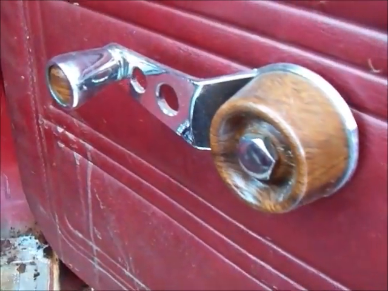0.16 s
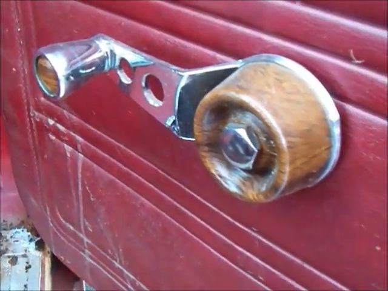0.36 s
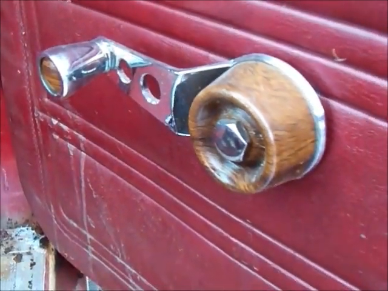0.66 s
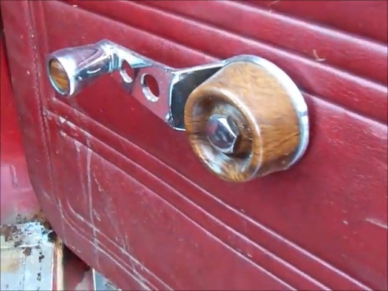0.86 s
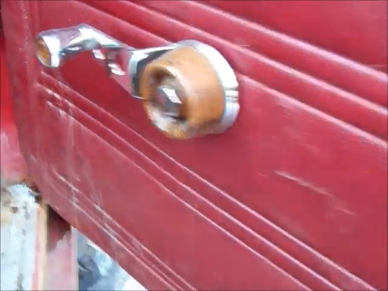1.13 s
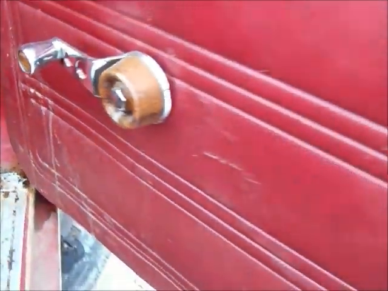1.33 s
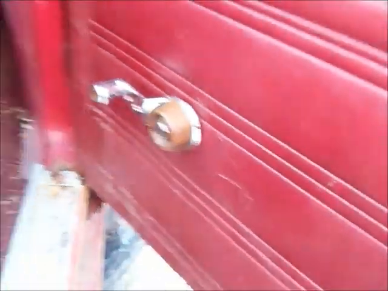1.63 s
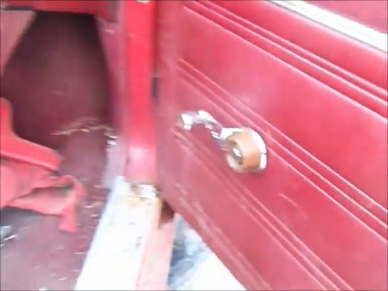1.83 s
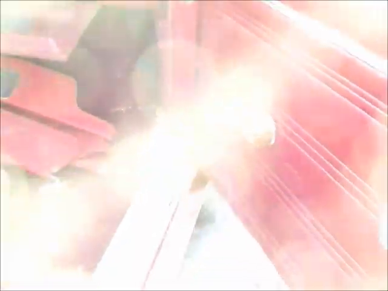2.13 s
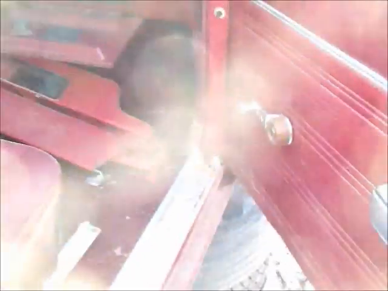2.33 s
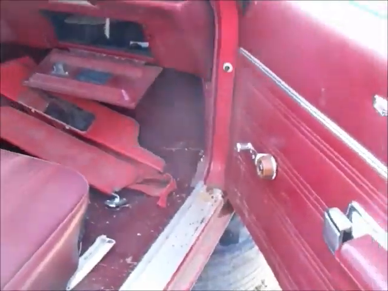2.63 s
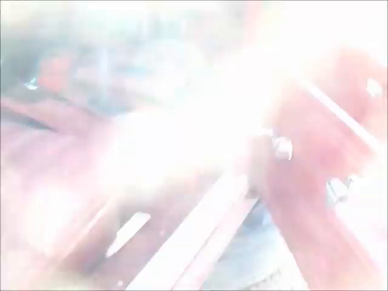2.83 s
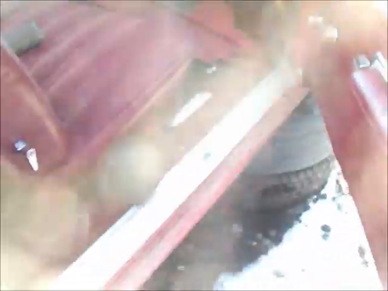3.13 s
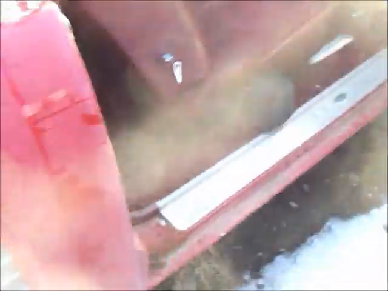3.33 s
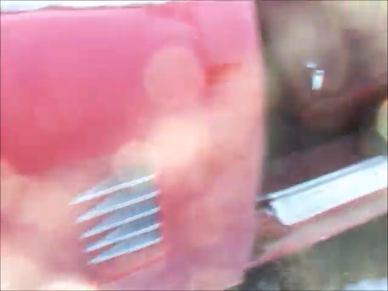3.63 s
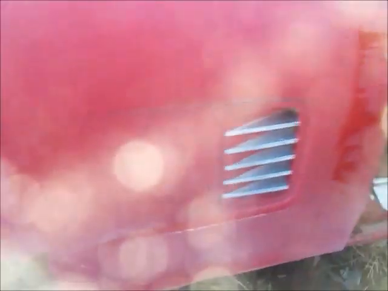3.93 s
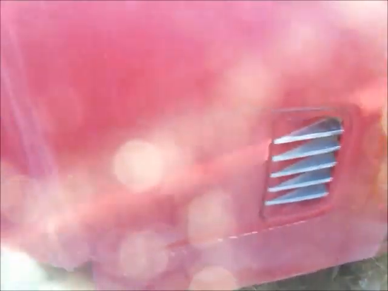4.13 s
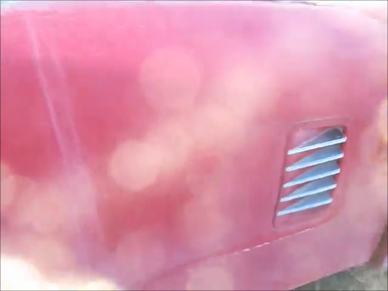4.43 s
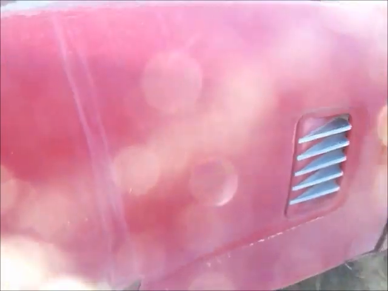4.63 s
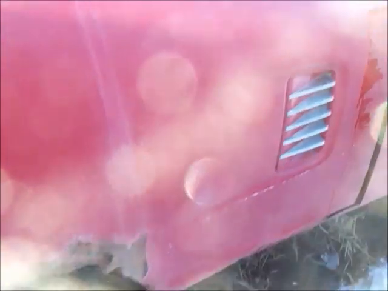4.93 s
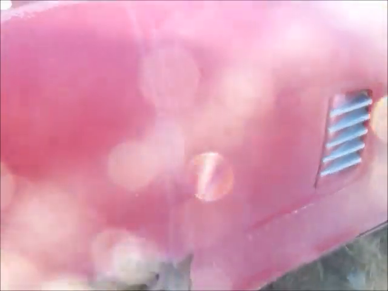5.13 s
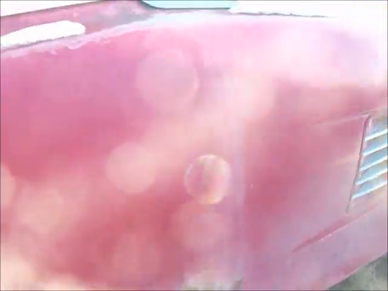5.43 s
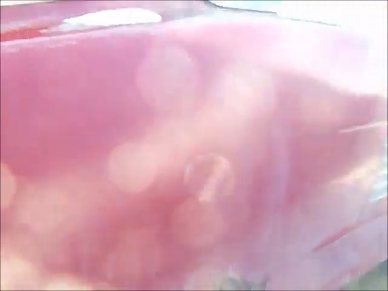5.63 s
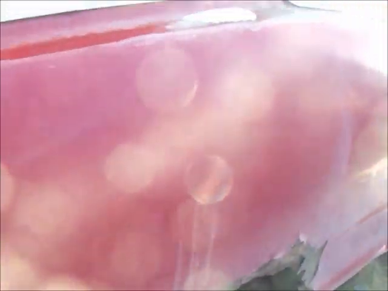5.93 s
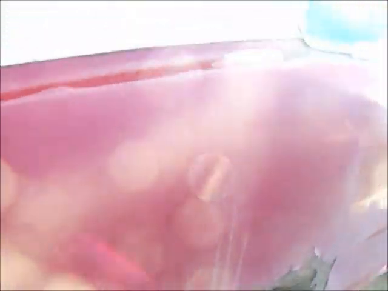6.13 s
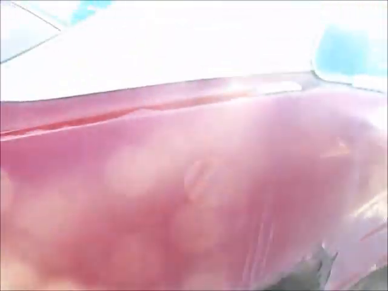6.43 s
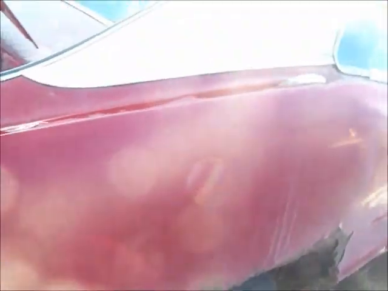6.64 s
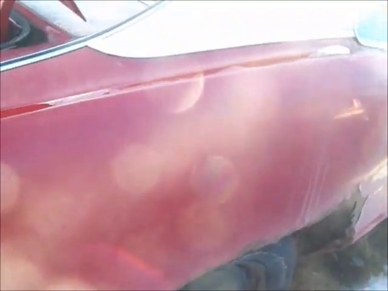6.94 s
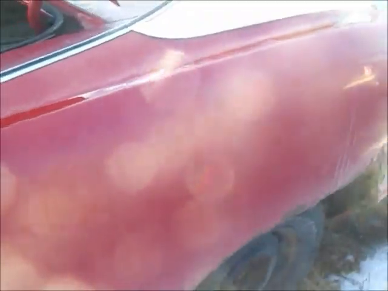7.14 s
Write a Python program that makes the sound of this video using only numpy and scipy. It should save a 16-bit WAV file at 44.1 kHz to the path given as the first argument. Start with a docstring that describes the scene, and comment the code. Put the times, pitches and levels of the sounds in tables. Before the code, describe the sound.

Outdoors beside an old car, faint wind, low hum and hiss lie under soft scuffs of shoes and clothing. A few crisp clicks lead to two ringing clunks from the loose steel door. It then slams and latches with a rattle and quick fading rebounds, overloading the close microphone. Lighter knocks and scuffs follow, ending with dull handling bumps.

```python
"""Outdoors beside an old car, light knocks, scuffs and clicks sound over faint wind, low hum and hiss.
Near 3.7 s the loose steel door clunks twice: each blow rings the modes of its skin and shakes the body.
Near 4.5 s the latch catches with a rattle, and the door settles in three fading rebounds.
These peaks overload the close microphone, whose gain control ducks the sound and slowly recovers.
More knocks and scuffs follow, and dull bumps on the hand-held camera close the scene."""
import sys
import numpy as np
from scipy import signal
from scipy.fft import rfft, irfft
from scipy.io import wavfile

SR = 44100
rng = np.random.default_rng(int(sys.argv[2]) if len(sys.argv) > 2 else 0)


def to_wav(s):
    """Save 16-bit WAV."""
    ch = np.atleast_2d(s).T  # columns
    pcm = np.round(np.clip(ch, -1, 1) * 32767)  # PCM
    wavfile.write(sys.argv[1], SR, pcm.astype(np.int16))


N = 320882
TIME = np.arange(N) / SR
AGE = np.arange(SR) / SR  # time since a blow, t/s

# blows on the door: t/s, level/dB, low cut f/Hz, contact cut-off f/Hz, door modes/dB, latch/dB, boom/dB
DOOR_BLOWS = [(3.727, -8, 350, 3770, 5.5, 0, -17.5), (3.91, -6, 135, 525, 9, -14, -10),
              (4.4995, -12, 70, 4000, -6.5, -4.5, -3.5), (4.512, -12, 90, 2200, -20, -12, -18),
              (4.5245, -12.5, 70, 550, 3.5, 3, -6.5), (4.572, -22, 80, 1600, -9, 1.5, -3),
              (4.588, -14, 70, 221, -15, -7.5, -11)]
# distinct modes of the door skin: f/Hz, level/dB, nominal T60/s
DOOR_MODES = [(220, -18, 0.49), (335.7, -1.5, 0.22), (346.3, 1.5, .22), (383.4, -12.5, 0.44),
              (480.4, -13, 0.11), (576, -3, 0.12), (693.4, 0.5, 0.11), (713, -12.5, 0.2), (820, -6.5, 0.11),
              (885, -1.5, 0.13), (980, -5, 0.18), (1045, 6, 0.077), (1217, -14.5, 0.16), (1304, -4, 0.085),
              (1290, -12.5, 0.045), (1457, -15, 0.21), (1490, -3, 0.1), (1640, -15, 0.19), (1768, 1, 0.084),
              (2383, -36, .11), (3400, -6, 0.069), (3730, -15, 0.113), (3800, -11, .11), (5140, 4, 0.055),
              (6000, -3, .05)]
# crowded lesser modes of the sheet steel: f/Hz, spectral level/dB, nominal T60/s
PANEL_BANDS = [(60, 3, 0.944), (139, 1.5, 0.39), (276, 0.5, 0.4), (604, -2, 0.3), (1010, -0.5, 0.25),
               (1836, -4, 0.18), (2296, -9, .11), (3540, -15.5, 0.17), (5820, -6, 0.14), (14500, -14, 0.13)]
# clash of the latch parts: f/Hz, spectral level/dB, T60/s
LATCH_BANDS = [(297, -2, 0.052), (987, -3.5, 0.15), (2210, 1, 0.092), (3450, 9, 0.071), (5700, 3.5, 0.052),
               (7740, -2.5, 0.069), (13400, 16.5, 0.022)]
# low modes of the whole car body: f/Hz, level/dB, T60/s
BODY_MODES = [(31.48, -5.5, 1), (42, -6.5, 0.29), (84.7, -6.5, 0.27), (102.7, -1, 0.21), (132, -2.5, 0.24)]
# light knocks: t/s, level/dB, centre f/Hz, bandwidth/Hz, T60/s
KNOCKS = [(.329, -33, 210, 111, 0.09), (0.337, -38, 457, 435, 0.19), (1.915, -40, 1370, 2400, 0.057),
          (2.731, -39.5, 676, 970, 0.064), (2.76, -39, 725, 1400, 0.16), (3.5989, -23, 563, 650, 0.021),
          (3.652, -29.5, 512, 807, 0.025), (4.411, -28, 1000, 170, 0.041), (5.151, -38.5, 626, 850, 0.031),
          (5.307, -35.5, 420, 980, 0.022), (5.474, -35.5, 390, 734, 0.029), (5.604, -40, 980, 2580, 0.059),
          (6.076, -47, 1590, 3020, .037), (6.259, -35.5, 596, 1400, 0.081),
          (6.326, -28.5, 600, 2200, 0.061), (6.571, -27.5, 676, 517, .023),
          (6.794, -36.5, 740, 2300, 0.077), (6.839, -44, 1000, 2600, .04)]
# crisp clicks, and the sudden, slowly fading start of a scuff: t/s, level/dB, T60/s
BRIGHT_BURSTS = [(3.335, -38, 0.21), (3.439, -23.5, .024), (3.447, -24, 0.026), (3.461, -22.5, 0.027),
                 (4.276, -44.5, 0.63), (4.394, -31, .017), (4.794, -41, .014), (5.054, -43.5, .048),
                 (5.311, -34.5, .016), (6.326, -36.5, 0.032)]
# spectrum of these bursts: f/Hz, spectral level/dB
BURST_SPECTRUM = [(400, -5.5), (1200, 1), (2200, 1.5), (5000, -3), (10000, 1), (14500, -3)]
# dull bumps: t/s, level/dB, f/Hz
BUMPS = [(4.599, -14, 140), (6.267, -25, 86), (6.343, -21, 94), (6.348, -27, 236), (6.549, -21.5, 51.3),
         (6.96, -15.5, 69.5), (7.094, -27, 141)]
# scuffs of shoes and clothing, and at 3.55 s a rub of the door hinge: t/s, duration/s, level/dB, cut-off f/Hz
SCUFFS = [(1.478, 0.59, -52, 4660), (1.707, 0.13, -41, 5030), (1.815, 0.1, -39.5, 5500),
          (2.203, 0.052, -45.5, 7000), (2.587, .125, -48.5, 4000), (2.874, 0.11, -53.5, 4000),
          (3.55, 0.21, -47, 1470), (4.286, .24, -48, 5900), (4.602, 0.11, -49.5, 5900),
          (5.229, 0.031, -49, 14000), (5.459, .17, -51.5, 9400), (5.587, 0.076, -42.5, 5000),
          (6.173, 0.24, -54.5, 3640), (6.891, 0.13, -53, 3000)]
# spectrum of rubbing: f/Hz, spectral level/dB
SCUFF_SPECTRUM = [(150, -24), (500, -4), (1400, -3.5), (1750, 1), (2300, -8.5), (3100, -5.5), (4800, -9),
                  (7200, -6.5), (10000, -8), (14500, -3)]
# gusts: peak t/s, half-width/s, level/dB
GUSTS = [(3.95, 0.23, -36.5), (4.773, 0.07, -37), (6.338, 0.12, -33.5), (7.077, 0.22, -37.5)]
# wind rumble on the microphone with a low hum near 40 Hz: f/Hz, spectral level/dB
WIND_AND_HUM_SPECTRUM = [(12, -1.5), (28, -4), (39, 4), (50, -5.5), (120, -14), (220, -21.5), (500, -33.5),
                         (2000, -73.5)]
# distant outdoor murk and microphone hiss: f/Hz, spectral level/dB
HUSH_SPECTRUM = [(30, -6), (120, -1), (300, -3.5), (600, -8.5), (1200, -14.5), (2500, -19), (4100, -19.5),
                 (4550, -13), (5050, -21.5), (6400, -22.5), (7200, -21), (8200, -24), (14500, -25)]
# slow course of that hush: t/s, level/dB
HUSH_LEVELS = [(0, -52), (3.5, -50), (5, -53.5), (6, -53.5), (7.28, -48.5)]


def door(caught_s=4.2, settle_s=4.627, gap_s=0.078, rebound_db=-29.5, drop_db=4.5):
    """Inelastic impacts: the door clunks, is caught by the latch and loses energy at every rebound."""
    # held fast, the door rings longer and the latch clashes more brightly
    loose, caught = dict(t60_scale=0.76, latch_hz=8400), dict(t60_scale=0.93, latch_hz=10800)
    out = np.zeros(N)
    for s, db, *timbre in DOOR_BLOWS:
        add(out, s, undb(db) * door_blow(*timbre, **(loose if s < caught_s else caught)))
    for k in range(3):
        rebound = door_blow(low_hz=105, contact_hz=800, modes_db=-3, latch_db=-11, boom_db=0, **caught)
        add(out, settle_s + k * gap_s, undb(rebound_db - k * drop_db) * rebound)
    return out


def door_blow(low_hz, contact_hz, modes_db, latch_db, boom_db, t60_scale, latch_hz):
    """Superposition: one blow excites the door skin, the latch and, more slowly, the booming body."""
    panel = dense_modes(PANEL_BANDS, t60_scale)
    ringing = undb(modes_db) * ring(DOOR_MODES, detune=0.0032, t60_scale=t60_scale)
    skin = roll_off(panel + ringing, contact_hz)  # a softer contact carries less treble
    impact = swell(rise_s=0.0021) * (skin + latch(latch_db, latch_hz))
    clunk = roll_off(impact, low_hz, "highpass", order=2)  # a smaller contact carries less bass
    boom = undb(boom_db) * swell(rise_s=0.011) * ring(BODY_MODES, detune=0.03)
    return clunk + boom


def latch(db, cutoff_hz, bite_s=0.0035, bite_db=2.5, chatter_db=1.0):
    """Double impact: the latch parts graze, bite a moment later and chatter as they ring."""
    bite = undb(bite_db) * swell(rise_s=0.0006) * dense_modes(LATCH_BANDS)
    late_bite = np.pad(bite, (int(bite_s * SR), 0))[:SR]
    chatter = undb(db + chatter_db * wander(rate_hz=900, size=SR))
    graze = dense_modes(LATCH_BANDS)
    return roll_off(chatter * (graze + late_bite), cutoff_hz, order=2)


def ring(modes, detune, t60_scale=1):
    """Free vibration: a sum of damped normal modes, slightly detuned at every blow."""
    waves = np.zeros(SR)
    for hz, db, t60 in modes:
        cycles = hz * rng.normal(1, detune) * AGE
        phase = (hz > 450) * rng.random()  # low modes follow the push; higher ones vary with the spot hit
        waves += undb(db) * decay(t60 * t60_scale) * np.sin(2 * np.pi * (cycles + phase))
    return waves / np.sqrt(sum(undb(db) ** 2 for _, db, _ in modes) / 2)


def dense_modes(bands, t60_scale=1, rise_cycles=0.43):
    """Modal overlap: crowded modes merge into noise, each band building and dying at its own rate."""
    noise = coloured(rng.standard_normal(SR), bands)
    log_hz = np.log([hz for hz, _, _ in bands])
    out = np.zeros(SR)
    for share, (hz, _, t60) in zip(np.eye(len(bands)), bands):
        band = filtered(noise, lambda f: np.interp(np.log(f), log_hz, share))
        out += band * decay(t60 * t60_scale) * swell(rise_cycles / hz)
    return out


def light_contacts():
    """Transient excitation: light contacts give separate knocks, bright bursts and bumps."""
    out = np.zeros(N)
    for source, events in (knock, KNOCKS), (bright_burst, BRIGHT_BURSTS), (bump, BUMPS):
        for s, db, *settings in events:
            add(out, s, undb(db) * source(*settings))
    return out


def knock(hz, width_hz, t60, tap=2.9):
    """Forced response: a tap and its brief chatter drive one broad, well damped resonance."""
    force = rng.standard_normal(SR) * decay(t60)
    force[0] += tap
    response = filtered(force, lambda f: (1 + 1j * (f - hz ** 2 / f) / width_hz) ** -2)
    return unit_rms(response) * np.sqrt(np.mean(decay(t60) ** 2))


def bright_burst(t60):
    """Broadband transient: sudden noise is heard as a click if brief, as a fading hiss if long."""
    return coloured(rng.standard_normal(SR), BURST_SPECTRUM) * decay(t60) * swell(rise_s=0.0012)


def bump(hz, t60_cycles=6):
    """Heavy damping: one low mode dies within a few cycles and is heard as a thud."""
    return np.sin(2 * np.pi * hz * AGE) * decay(t60_cycles / hz) * swell(rise_s=0.0014)


def scuffs(grit_db=3.5, taper=0.73):
    """Stick-slip friction: shoes, clothing and the door hinge catch and release in fine, uneven grains."""
    out = np.zeros(N)
    for s, length_s, db, cutoff_hz in SCUFFS:
        grains = rng.standard_normal(SR) * undb(grit_db * wander(rate_hz=700, size=SR))
        rubbing = roll_off(coloured(grains, SCUFF_SPECTRUM), cutoff_hz)
        stroke = signal.windows.tukey(int(length_s * SR), taper)
        add(out, s, undb(db) * unit_rms(rubbing[:len(stroke)]) * stroke)
    return out


def wind_and_hum(breeze_db=-46, easing_db_per_s=0.5, flutter_db=2):
    """Turbulence: an easing breeze and gusts buffet the microphone; a low hum is heard with them."""
    breeze = undb(breeze_db - easing_db_per_s * TIME)
    gusts = [undb(db) * np.exp(-((TIME - s) / half_s) ** 2) for s, half_s, db in GUSTS]
    strength = np.sqrt(breeze ** 2 + sum(gust ** 2 for gust in gusts))
    rumble = coloured(rng.standard_normal(N), WIND_AND_HUM_SPECTRUM)
    return rumble * strength * undb(flutter_db * wander(rate_hz=7.6, size=N))


def hush(waver_db=1.6):
    """Noise floor: distant outdoor sound and microphone hiss form one gently wavering bed."""
    noise = coloured(rng.standard_normal(N), HUSH_SPECTRUM)
    level_db = np.interp(TIME, *np.transpose(HUSH_LEVELS))
    return noise * undb(level_db - waver_db * wander(rate_hz=6.1, size=N))


def undb(db):
    """Amplitude ratio of a level in decibels."""
    return 10 ** (np.asarray(db) / 20)


def unit_rms(x):
    """Normalisation to rms 1."""
    return x / np.sqrt(np.mean(x ** 2))


def add(out, s, x):
    """Superposition of x on out, starting at s seconds."""
    i = int(s * SR)
    out[i:i + len(x)] += x[:N - i]


def decay(t60):
    """Exponential decay by 60 dB in t60 seconds."""
    return np.exp(-np.log(1000) * AGE / t60)


def swell(rise_s):
    """Finite rise time: force builds up while two parts press together."""
    return 1 - np.exp(-(AGE / rise_s) ** 2)


def filtered(x, response):
    """Linear filtering: the spectrum of x is multiplied by a frequency response."""
    return irfft(rfft(x) * response(np.fft.rfftfreq(len(x), 1 / SR) + 1e-6), len(x))


def coloured(x, spectrum):
    """Spectral shaping by (f/Hz, level/dB) points, with nothing above the last, at rms 1."""
    hz, db = np.transpose(spectrum)[:2]
    return unit_rms(filtered(x, lambda f: undb(np.interp(np.log(f), np.log(hz), db, right=-np.inf))))


def roll_off(x, hz, kind="lowpass", order=1):
    """Attenuation beyond a cut-off, about 6 dB per octave for each order."""
    return signal.sosfilt(signal.butter(order, hz, kind, fs=SR, output="sos"), x)


def wander(rate_hz, size):
    """Random modulation: linear interpolation between standard normal values."""
    steps = np.arange(size) / SR * rate_hz
    count = int(steps[-1]) + 2
    return np.interp(steps, np.arange(count), rng.standard_normal(count))


def scene():
    """Superposition: the pressures of all sources add at one microphone."""
    return (door() + light_contacts() + scuffs() + wind_and_hum() + hush())[None]


def record(dry, ceiling=0.43, threshold_db=-11, recover_db_per_s=0.53, lag_s=0.15, top_hz=14000):
    """Saturation and gain control: peaks clip, the gain drops and creeps back, and the top is cut."""
    clipped = dry / (1 + (dry / ceiling) ** 8) ** (1 / 8)
    over_db = np.maximum(20 * np.log10(np.abs(clipped) + 1e-9) - threshold_db, 0)
    recovery_db = recover_db_per_s * TIME
    held_db = np.maximum.accumulate(over_db + recovery_db, axis=-1) - recovery_db  # leaky peak hold
    step = 1 / (lag_s * SR)
    duck_db = signal.lfilter([step], [1, step - 1], held_db)
    band_limit = signal.ellip(10, .2, 80, top_hz, fs=SR, output="sos")
    return signal.sosfilt(band_limit, clipped * undb(-duck_db))


dry = scene()
out = record(dry)
to_wav(out)
```